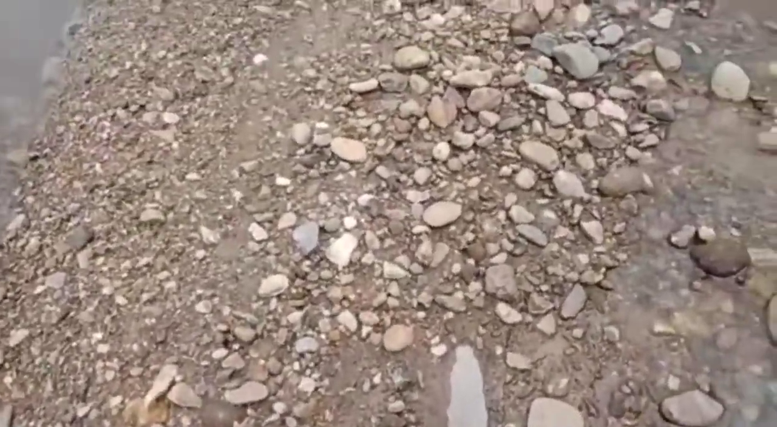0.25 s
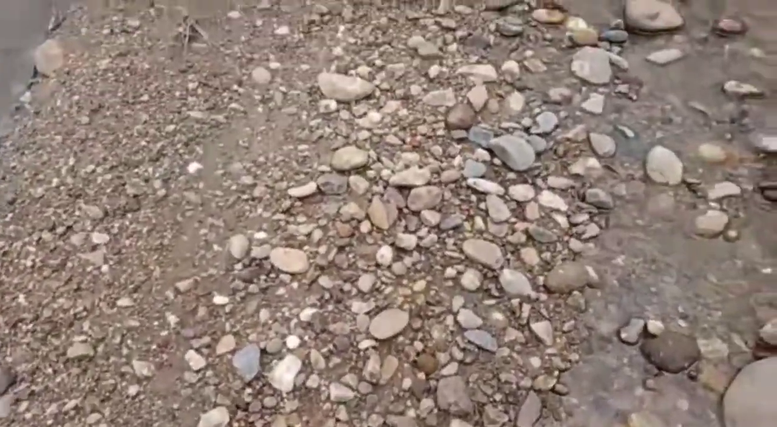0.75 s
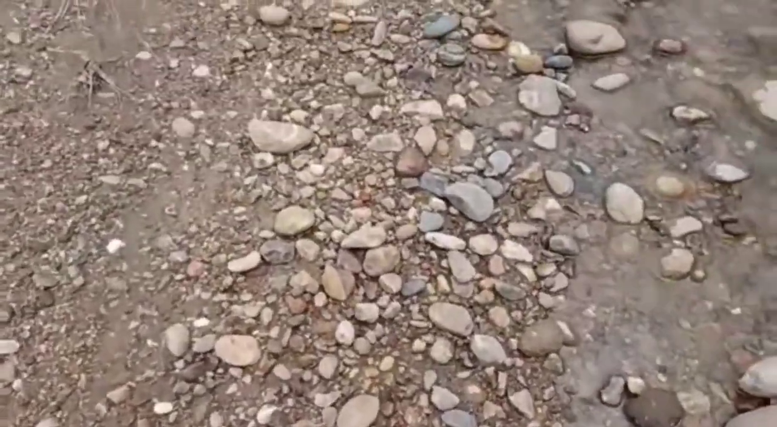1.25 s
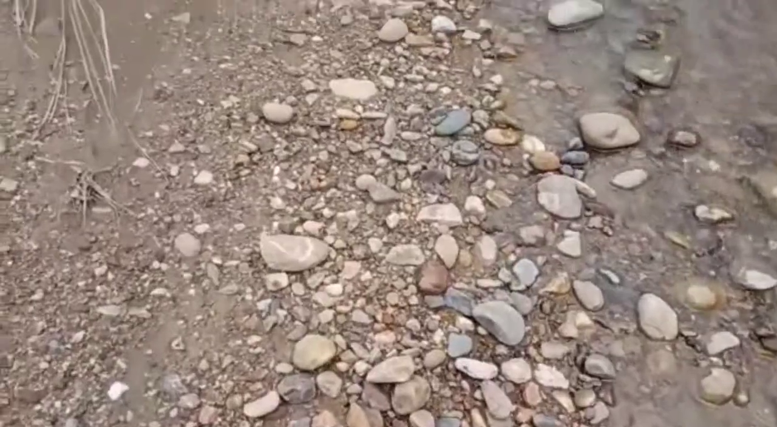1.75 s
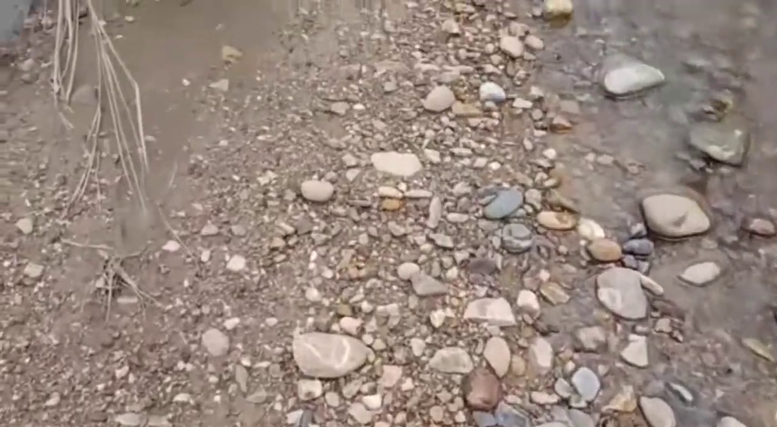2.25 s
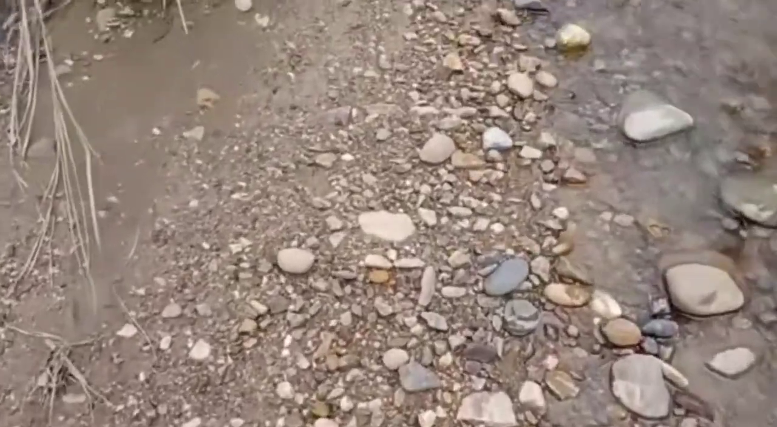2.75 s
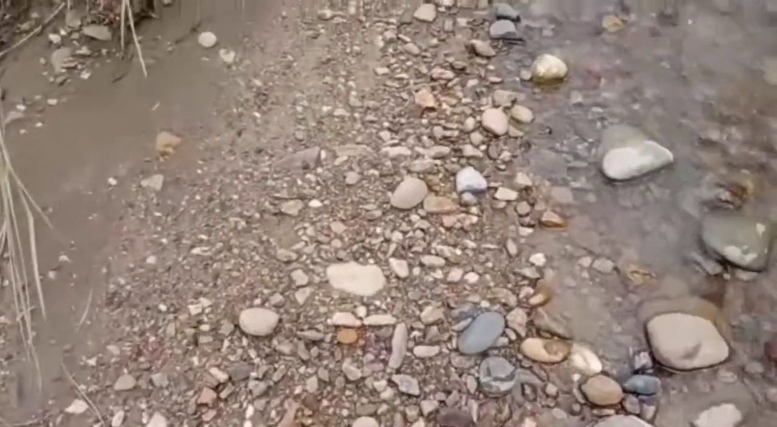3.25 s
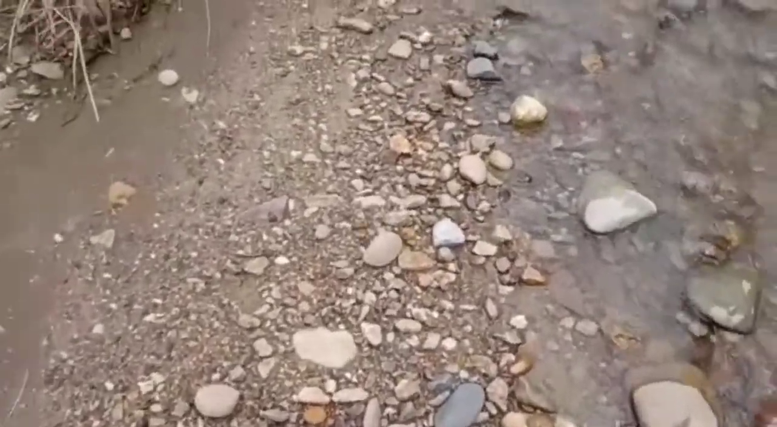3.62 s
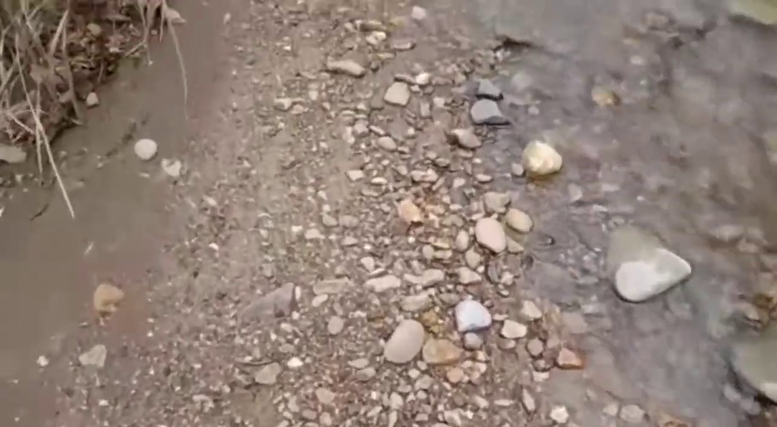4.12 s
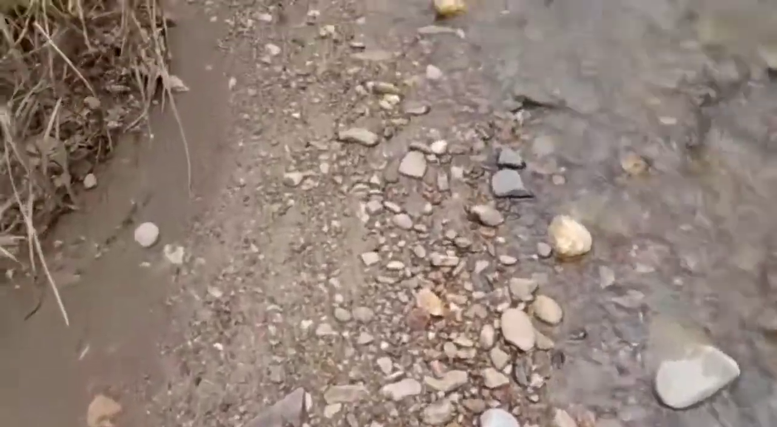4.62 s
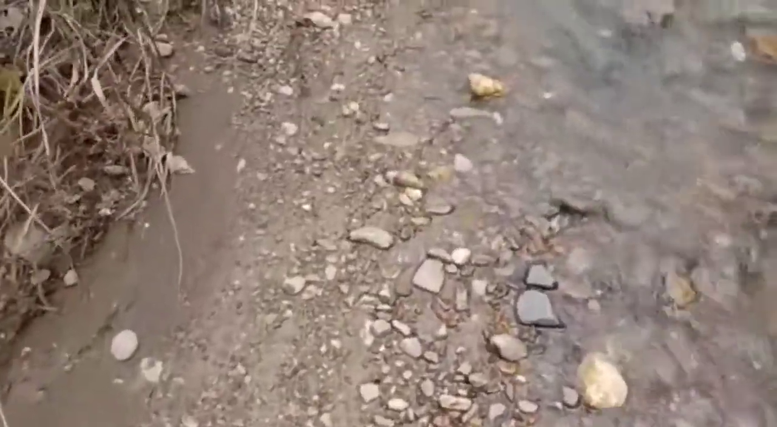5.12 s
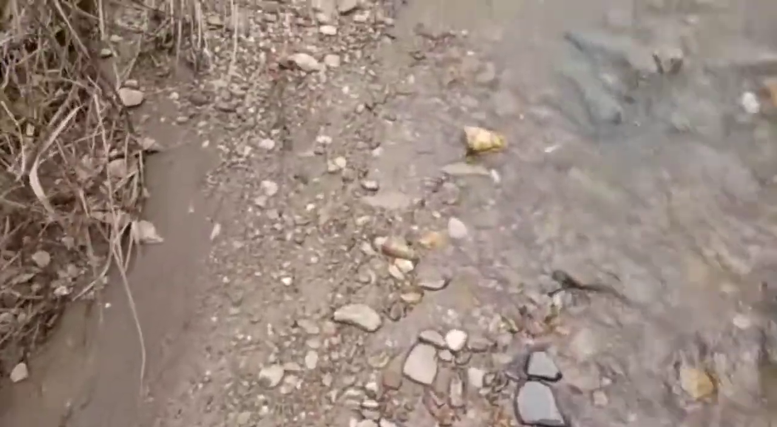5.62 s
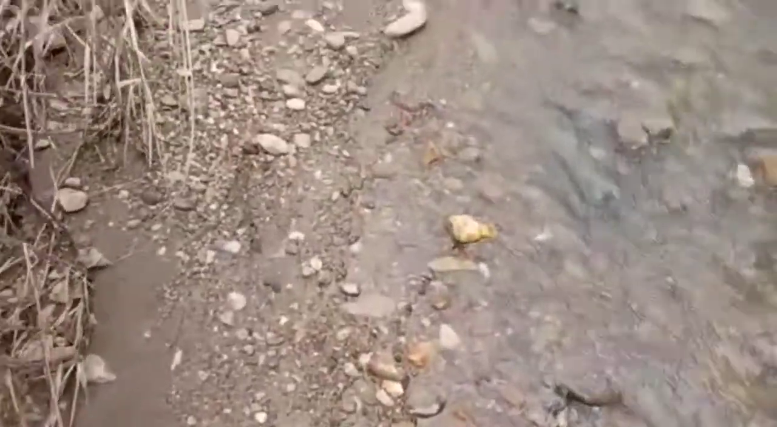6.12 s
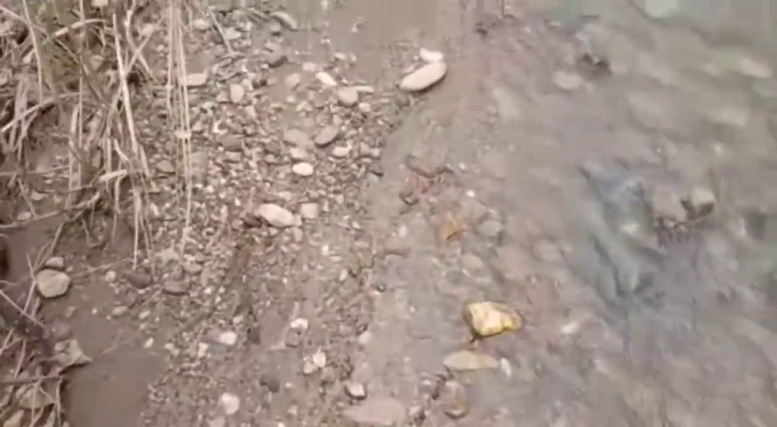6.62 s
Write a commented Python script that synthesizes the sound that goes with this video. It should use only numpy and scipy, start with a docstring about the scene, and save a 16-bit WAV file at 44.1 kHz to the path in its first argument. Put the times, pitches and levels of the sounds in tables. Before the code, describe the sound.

A shallow river runs throughout as a steady, midrange rush full of small bubbles, with faint hissing spray and only slight surges. Over it, slow footsteps press wet gravel close to the microphone. From 0 to 0.5 s there is a soft crunch with a few dull pebble knocks; another light press comes at 1.0 s with a clear drop tick, then quiet grinding from 1.4 to 2.0 s. At 2.3 to 2.75 s a firm step crunches and pebbles clack brightly. Calmer water follows until a longer gritty press at 3.5 to 4.0 s. Grit builds from 4.6 s into the loudest, sharp cluster of clacks near 4.95 s. A small bubble plops at 5.1 s and a drop ticks at 5.3 s. Another hard clatter hits at 5.7 s, loose stones settle to 6.2 s, and a last short crunch and clack come around 6.5 to 6.7 s. Open air, mono, dry.

```python
"""A shallow river rushes and burbles over stones while someone walks slowly along its wet gravel bar.
Under each step grit crunches and pebbles clack together; tiny drops tick in the wet gravel.
One channel, as from a single microphone in the open air. The current is flickering noise and thousands
of ringing bubbles; grit and pebbles are clicks through resonances; drops are short resonant noise bursts."""
import sys
import numpy as np
from scipy import signal
from scipy.fft import rfft, irfft
from scipy.io import wavfile

SR = 44100
rng = np.random.default_rng(int(sys.argv[2]) if len(sys.argv) > 2 else 0)


def master_out(mix):
    """Clip the mix to full scale and print it as 16-bit PCM to the path in sys.argv[1]."""
    frames = np.transpose(np.atleast_2d(mix))
    ceiling = np.clip(frames, -1, 1)
    pcm = np.round(ceiling * 32767).astype(np.int16)
    wavfile.write(sys.argv[1], SR, pcm)


N = 302967

# lower note of the larger stones bedded in the gravel
HOLLOW_HZ, HOLLOW_WIDTH_HZ = 1348, 230


def from_db(db):
    """Decibels to gain."""
    return 10 ** (np.asarray(db) / 20)


def rms_one(x):
    """Scale to rms 1."""
    return x / np.sqrt(np.mean(x ** 2) + 1e-20)


def at_hz(points, hz):
    """Read a spectrum, joined by straight lines on a log-frequency axis."""
    points = np.array(points)
    return np.interp(np.log(np.maximum(hz, 1)), np.log(points[:, 0]), points[:, 1])


def drift(rate_hz):
    """Smooth random wandering with rms 1: noise through a two-pole low-pass at the given rate."""
    step = 40  # samples between drawn points
    warm_up = 2000  # points dropped while the filter settles
    r = np.exp(-2 * np.pi * rate_hz * step / SR)
    noise = rng.standard_normal(N // step + 2 + warm_up)
    smooth = signal.lfilter([1], [1, -2 * r, r * r], noise)[warm_up:]
    return np.interp(np.arange(N) / step, np.arange(len(smooth)), rms_one(smooth))


def response(spectrum, size=2048):
    """Causal (minimum-phase) impulse response with the given colour."""
    gain = from_db(at_hz(spectrum, np.linspace(0, SR / 2, size // 2 + 1)))
    cepstrum = irfft(np.log(gain))
    # folding the cepstrum forward in time makes the response causal
    cepstrum[1:size // 2] *= 2
    cepstrum[size // 2 + 1:] = 0
    return irfft(np.exp(rfft(cepstrum)))


def colour(x, impulse):
    """Pass a sound through an impulse response."""
    return signal.fftconvolve(x, impulse)[:len(x)]


def resonate(x, hz, width_hz):
    """One resonance with gain 1 on top."""
    r = np.exp(-np.pi * width_hz / SR)
    zeros = np.array([1, 0, -1]) * (1 - r * r) / 2
    poles = [1, -2 * r * np.cos(2 * np.pi * hz / SR), r * r]
    return signal.lfilter(zeros, poles, x + 1e-18)


def add(out, s, sound):
    """Mix a short sound in at a time in seconds."""
    i = int(np.clip(round(s * SR), 0, N - 1))
    out[i:i + len(sound)] += sound[:N - i]


def grains(per_s, spread_db):
    """Random clicks of either sign, most small and a few large."""
    size_db = spread_db * np.minimum(rng.exponential(1, N), 4.5)
    sizes = from_db(size_db) * rng.choice([-1, 1], N)
    return sizes * (rng.random(N) < per_s / SR)


def rush(flicker_db, flicker_hz):
    """The blur of the farther current: white noise whose half-octave bands flicker on their own."""
    hz = np.linspace(0, SR / 2, N // 2 + 1)
    white = rfft(rng.standard_normal(N))
    edges = np.r_[0, 200 * 2 ** np.arange(0, 7.1, .5)]
    out = 0
    for low, high in zip(edges, edges[1:]):
        band = irfft(white * ((hz >= low) & (hz < high)), N)
        out = out + band * from_db(flicker_db * drift(flicker_hz))
    return rms_one(out)


def bubble(hz, t60, rise):
    """A bubble rings down by 60 dB in t60 seconds, its pitch climbing as it nears the surface."""
    t = np.arange(int(t60 * SR) + 2) / SR
    ring = np.sin(2 * np.pi * hz * t * (1 + rise * t / t60 / 2))
    onset = 1 - np.exp(-t * hz)
    return ring * from_db(-60 * t / t60) * onset


def burble(spread_db, cycles, rise, count=9000):
    """Thousands of bubbles of all sizes; the small, high ones are more common and die sooner."""
    out = np.zeros(N)
    for when, size, strength, damping in rng.random((count, 4)):
        hz = 300 * (5500 / 300) ** (size ** .7)  # 300 to 5500 Hz
        gain = from_db(spread_db * min(-np.log(1 - strength), 4)) * (hz / 1000) ** 0.78
        t60 = cycles * (.5 + damping) / hz
        add(out, when * N / SR, gain * bubble(hz, t60, rise))
    return rms_one(out)


# Colour of the current over the stones. Each row: frequency in Hz, filter gain in dB.
CURRENT_COLOUR = [(20, -40), (60, -20.5), (110, -13.5), (190, -13), (300, -12.5), (440, -4), (800, 0.5),
                  (1200, -1.5), (2000, -3.5), (3300, -2), (4400, -9.5), (6000, -26.5), (7800, -29),
                  (11300, -22), (15800, -42)]
# Fine wet hiss of the ripples. Each row: time in seconds, level in dB, joined by straight lines.
SPRAY_LEVEL = [(0.0, -54.5), (0.74, -57), (1.09, -54), (3.31, -55), (3.65, -53.5), (4.4, -55), (4.73, -53),
               (6.87, -54)]


def river(river_db=-33.5, bubbles_db=-10.0, surge_db=0.21, surge_hz=0.55, spray_hz=6500, crackle_db=-1.0):
    """Rush and near bubbles share one colour and surge gently; fine spray hisses and crackles above."""
    tone = response(CURRENT_COLOUR, size=8192)
    bubbles = burble(spread_db=4.0, cycles=22.6, rise=0.1)
    water = rush(flicker_db=1.75, flicker_hz=19.0) + from_db(bubbles_db) * bubbles
    water = rms_one(colour(water, tone))

    high = signal.butter(4, spray_hz, "high", fs=SR, output="sos")
    hiss = signal.sosfiltfilt(high, water)
    pops = sum(resonate(grains(per_s=60, spread_db=3.4), hz, 600) for hz in np.geomspace(6000, 14500, 16))
    crackle = signal.sosfilt(high, colour(pops, tone))
    spray = rms_one(rms_one(hiss) + from_db(crackle_db) * rms_one(crackle))

    # the hiss leaves the current, so that the spray swells on its own
    current = from_db(river_db + surge_db * drift(surge_hz)) * (water - hiss)
    spray_s, spray_db = np.transpose(SPRAY_LEVEL)
    return current + from_db(np.interp(np.arange(N) / SR, spray_s, spray_db)) * spray


# A sole presses or pushes off the gravel. Each row: start in seconds, length in seconds,
# tread level at first in dB (before the crunch's trim), swell as the weight comes on in dB,
# boost or cut of the coarse stones' lower note in dB.
FOOT_PRESSES = [(0.0, .17, -34.5, -3, 1.5), (0.325, .035, -33, 2, -15), (1.009, .16, -35.5, -1.5, 3),
                (1.418, .55, -41.5, -2, -8), (2.279, .05, -25.5, 0.5, -5), (2.364, .05, -28, 2, 7),
                (2.499, .072, -22, 5.5, 4.5), (3.495, .48, -34, -1.5, 2), (4.167, 0.092, -37.5, -0.5, -5),
                (4.618, .29, -31, 4.5, -1), (4.929, .048, -23.5, 6.5, 0), (5.032, .1, -35, 0, -7),
                (5.627, .035, -33.5, 5, 6.5), (5.683, .045, -23, -8, -6), (5.846, .16, -36, -1, -10),
                (6.52, .025, -32, -2, -4), (6.638, .035, -29.5, 0.5, 7)]


def tread(attack_s=0.011, release_s=0.01, settle_db=-18, settle_s=.13, shuffle_db=-47):
    """Tread level and coarseness in dB: a press comes on fast, swells, lets go, and the grit settles."""
    t = np.arange(N) / SR
    power = from_db(shuffle_db) ** 2  # gravel never lies quite still under the walker
    coarse = 0
    settling = from_db(settle_db)  # loosened grit trickles on
    for start, length, db, swell_db, coarse_db in FOOT_PRESSES:
        before = np.maximum(start - t, 0)
        after = np.maximum(t - start - length, 0)
        weight = from_db(db + swell_db * np.clip((t - start) / length, 0, 1))
        release = (1 - settling) * np.exp(-after / release_s) + settling * np.exp(-after / settle_s)
        press = (weight * np.exp(-before / attack_s) * release) ** 2
        power = power + press
        coarse = coarse + press * coarse_db
    return 10 * np.log10(power), coarse / power


# Colour of crunching grit. Each row: frequency in Hz, filter gain in dB.
GRIT_COLOUR = [(60, -51), (300, -22), (750, -12.5), (1300, -12.5), (1900, -11.5), (2600, -5.5),
               (3400, -0.5), (4200, -2), (5000, -12.5), (6000, -67), (8000, -47), (11000, -54),
               (16000, -80)]
# Colour of water and fine sand squeezed between stones. Each row: frequency in Hz, filter gain in dB.
FIZZ_COLOUR = [(100, -46), (2500, -10), (5200, 14), (6500, 1), (8000, 0.5), (11300, 6.5), (13500, -6),
               (16000, -14)]


def crunch(tread_db, coarse_db, level_db=-0.5, clump_db=1.55, clump_hz=124,
           squish_db=-53.0, squish_growth=0.55, coarse_width_hz=1200):
    """Grit slips in clumps, denser under a harder tread; water pressed from between the grains fizzes."""
    per_s = 75 * from_db(.45 * (tread_db + 40))
    slipping_db = tread_db + clump_db * drift(clump_hz)
    # dividing by the root of the rate keeps the power even, so the tread alone sets the level
    stones = sum(resonate(grains(per_s / 2, spread_db=2.8), hz, 300) for hz in np.geomspace(1250, 4900, 12))
    stones = rms_one(stones / np.sqrt(per_s))
    sand = rms_one(grains(per_s * 25, spread_db=2.6) / np.sqrt(per_s))
    grit = rms_one(colour(stones + from_db(-9) * sand, response(GRIT_COLOUR)))
    grit = grit + (from_db(coarse_db) - 1) * resonate(grit, HOLLOW_HZ, coarse_width_hz)

    fizz = rms_one(colour(sand, response(FIZZ_COLOUR)))
    squish = from_db(squish_db + squish_growth * (slipping_db + 30.5)) * fizz
    return from_db(slipping_db + level_db) * grit + squish


def moments(rate_db, chances):
    """Turn uniform chances into sample positions that crowd where the rate is high."""
    total = np.cumsum(from_db(rate_db))
    return np.searchsorted(total, chances * total[-1])


def random_knocks(tread_db, level_db=-28.5, crowding=.45, follows=.2, spread_db=2.2, ring_hz=3400,
                  ring_spread=0.097, low_db=-12.0, low_spread_db=0.5, count=60):
    """Further, quieter pebble knocks come at random, more often and harder under a heavy tread; rows as for
    clacks."""
    at = moments(crowding * tread_db, rng.random(count))
    size, pitch, bed = np.clip(rng.standard_normal((count, 3)), -2, 2).T
    db = level_db + follows * (tread_db[at] + 30.5) + spread_db * size
    return list(zip(at / SR, db, ring_hz * np.exp(ring_spread * pitch), low_db + low_spread_db * bed))


# The loudest pebble knocks. Each row: start in seconds, level in dB (before the shared trim), # ring in Hz,
# hollow low ring in dB against the clack (before its trim).
PEBBLE_KNOCKS = [(0.1298, -24.5, 3460, 5.5), (0.165, -23, 3820, 0), (0.3515, -29, 2700, -19),
                 (1.0647, -23.5, 2430, -4), (1.5063, -21, 2580, -2), (1.6496, -24.5, 2900, -17),
                 (1.728, -23.5, 2160, -16), (1.7773, -25.5, 3400, -10), (1.8918, -24, 2670, -5),
                 (2.3053, -16.5, 3960, -24), (2.355, -20, 4000, -20), (2.4119, -23, 3900, -6),
                 (2.463, -19.5, 3330, -23), (2.489, -19, 2970, -11), (2.5083, -12.5, 3520, -10),
                 (2.522, -17, 3850, -8), (2.5434, -34, 3170, -8), (2.5598, -9, 3280, -7.5),
                 (2.5696, -11, 3260, -1.5), (2.6602, -19, 3700, -3), (2.7293, -14.5, 3300, -1.5),
                 (2.7477, -9.5, 3770, -11), (2.7526, -13, 3640, -8), (3.2976, -25, 3660, -6),
                 (3.638, -18.5, 3450, -6), (3.6615, -15, 3420, -0.5), (3.8793, -17.5, 3550, -6),
                 (3.898, -22, 3320, -19), (3.945, -18.5, 3500, -16), (4.6112, -22.5, 4160, -22),
                 (4.6262, -19.5, 3360, -3), (4.8329, -20, 3620, -13), (4.8577, -22, 3720, -15),
                 (4.876, -19, 3800, -1), (4.919, -13.5, 3500, -10), (4.9264, -9, 3880, -19),
                 (4.953, -14, 3660, -24), (4.9637, -6, 3770, -29), (4.972, -8, 3600, -15),
                 (5.2092, -17, 4500, -20), (5.667, -20, 3680, -23), (5.6838, -9.5, 3480, -33),
                 (5.688, -10.5, 3350, -31), (5.6927, -10.5, 4170, -34), (5.7237, -15, 4170, -25),
                 (5.7589, -19, 3730, -22), (5.8414, -20.5, 2840, -25), (5.8697, -22.5, 3730, -14),
                 (5.9082, -18.5, 3800, -20), (5.9459, -20.5, 2980, -27), (6.1918, -15.5, 3200, -27),
                 (6.5186, -20, 3160, -25), (6.6205, -11, 3680, -15), (6.6546, -21.5, 3190, 3.5),
                 (6.6775, -17, 3460, -3)]
# Colour of the sharp contact between two pebbles. Each row: frequency in Hz, filter gain in dB.
CONTACT_COLOUR = [(60, -55), (800, -23.5), (1400, -21.5), (2000, -7.5), (2700, 8), (3400, 3), (4200, -1),
                  (5000, -2.5), (6000, -28.5), (8000, -38), (11000, -49), (16000, -42)]


def clacks(knocks, level_db=-2.0, ring_width_hz=560, crack_db=-3.5, hollow_db=-2.5, chatter_s=.0036,
           fizz_db=-33.0, fizz_s=0.0071, size=1536, count=5):
    """Two pebbles touch and chatter, each touch weaker, at a slightly different pitch; wet sand spits."""
    out = np.zeros(N)
    contact, fizz = response(CONTACT_COLOUR), response(FIZZ_COLOUR)
    t = np.arange(size) / SR
    window = np.sqrt(.004 * SR / size)  # levels count as rms over 4 ms
    for s, db, hz, low_db in knocks:
        touches = np.zeros((count, size))
        scrape = rng.standard_normal(size) * np.exp(-t / .003)
        touches[0] = (t == 0) + from_db(-31) * scrape
        share = (np.arange(count - 1) + rng.uniform(.3, 1, count - 1)) / (count - 1)
        at = (share * chatter_s * SR).astype(int)
        touches[np.arange(1, count), at] = np.exp(-1.3 * share) * rng.choice([-1, 1], count - 1)

        pitches = hz * np.r_[1, rng.uniform(.86, 1.16, count - 1)]
        ring = sum(resonate(touch, pitch, ring_width_hz) for touch, pitch in zip(touches, pitches))
        ring = colour(resonate(ring, hz, 2 * ring_width_hz), contact)
        crack = colour(touches.sum(0), contact)
        # larger stones bedded in the gravel answer with a lower, hollow note
        hollow = resonate(crack, HOLLOW_HZ * rng.uniform(1.0, 1.15), HOLLOW_WIDTH_HZ)
        hollow = resonate(hollow, HOLLOW_HZ, 2 * HOLLOW_WIDTH_HZ)

        clack = rms_one(rms_one(ring) + from_db(crack_db) * rms_one(crack))
        clack = clack + from_db(low_db + hollow_db) * rms_one(hollow)
        spit = rms_one(colour(rng.standard_normal(size) * np.exp(-t / fizz_s), fizz))
        # the spit grows only half as fast in dB as the clack
        add(out, s, window * (from_db(db + level_db) * clack + from_db(db / 2 + fizz_db) * spit))
    return out


def small_drops(tread_db, level_db=-33.5, spread_db=2.0, crowding=0.22, low_hz=8500, high_hz=12800, count=36):
    """Faint drops tick at random, a little more often under a foot; rows as for ticks."""
    when, size, pitch = rng.random((count, 3)).T
    s = moments(crowding * tread_db, when) / SR
    return list(zip(s, level_db + spread_db * (2 * size - 1), low_hz + (high_hz - low_hz) * pitch))


# The clearest drops on wet stone. Each row: start in seconds, peak in dB (before the shared trim),
# pitch in Hz.
CLEAR_DROPS = [(0.327, -28, 10800), (1.084, -23.5, 10900), (1.0845, -13, 5030), (3.012, -27, 9800),
               (3.057, -24.5, 10400), (3.327, -24.5, 10400), (3.533, -28.5, 10000), (4.195, -36, 14200),
               (5.327, -14.5, 4280), (5.727, -19, 4850), (5.842, -22, 5300), (5.871, -28, 6000),
               (5.946, -28, 10900), (6.52, -26.5, 9100)]


def ticks(drops, level_db=-5.5, width=0.18, size=768):
    """Tiny drops burst with a short, thin tick; its resonance is a share of its pitch wide."""
    out = np.zeros(N)
    for s, db, hz in drops:
        burst = rng.standard_normal(size) * np.exp(-np.arange(size) / SR / .0018)
        tick = resonate(resonate(burst, hz, width * hz), hz, width * hz)
        add(out, s, from_db(db + level_db) * tick / np.abs(tick).max())
    return out


# Single bubbles in the current. Each row: start in seconds, level in dB, starting pitch in Hz,
# time to fall by 60 dB in seconds.
LONE_BUBBLES = [(0.64, -34, 577, 0.061), (0.644, -33, 262, 0.028), (3.04, -33, 4570, 0.095),
                (3.049, -39.5, 289, 0.3), (4.625, -31, 475, 0.16), (5.133, -21, 790, 0.06),
                (6.14, -26, 600, 0.076)]


def gurgles():
    """Now and then one bubble stands out of the current, its pitch rising by 24 percent."""
    out = np.zeros(N)
    for s, db, hz, t60 in LONE_BUBBLES:
        add(out, s, from_db(db) * bubble(hz, t60, rise=.24))
    return out


def scene():
    """The river and the footsteps in the open air."""
    water = river() + gurgles()
    tread_db, coarse_db = tread()
    steps = crunch(tread_db, coarse_db)
    steps = steps + clacks(PEBBLE_KNOCKS + random_knocks(tread_db))
    steps = steps + ticks(CLEAR_DROPS + small_drops(tread_db))
    return (water + steps)[None]


def record(dry, cutoff_hz=15900):
    """The highest peaks are rounded and the top is cut steeply."""
    rounded = dry / (1 + (dry / .97) ** 8) ** (1 / 8)
    return signal.sosfilt(signal.ellip(10, .1, 80, cutoff_hz, fs=SR, output="sos"), rounded)


dry = scene()
out = record(dry)
master_out(out)
```